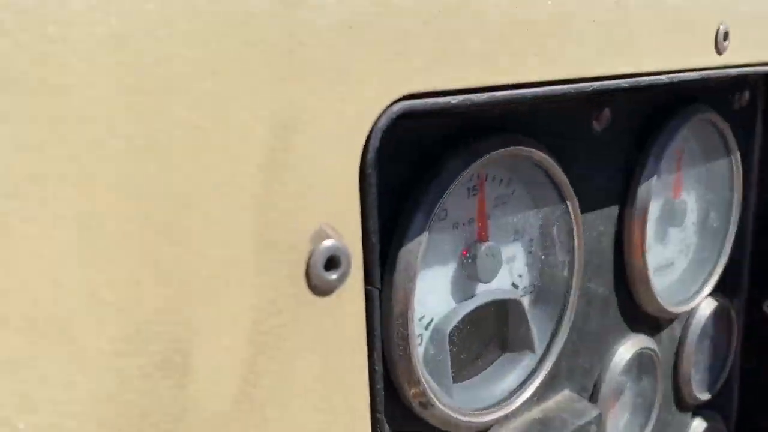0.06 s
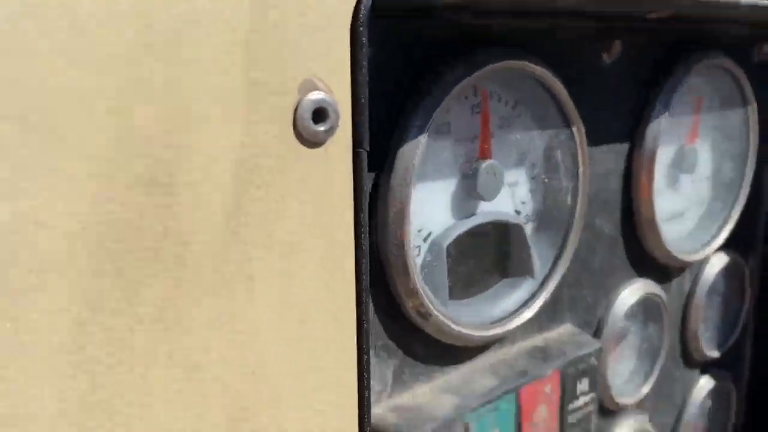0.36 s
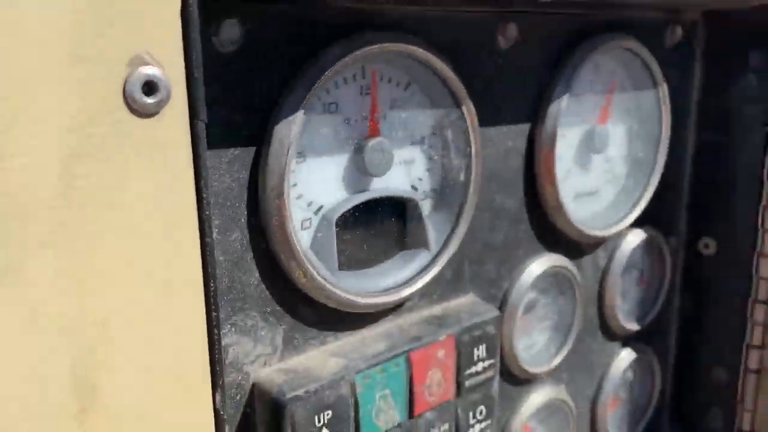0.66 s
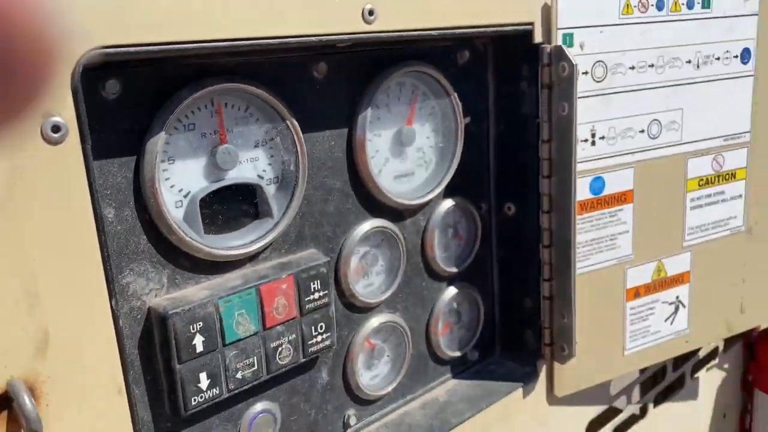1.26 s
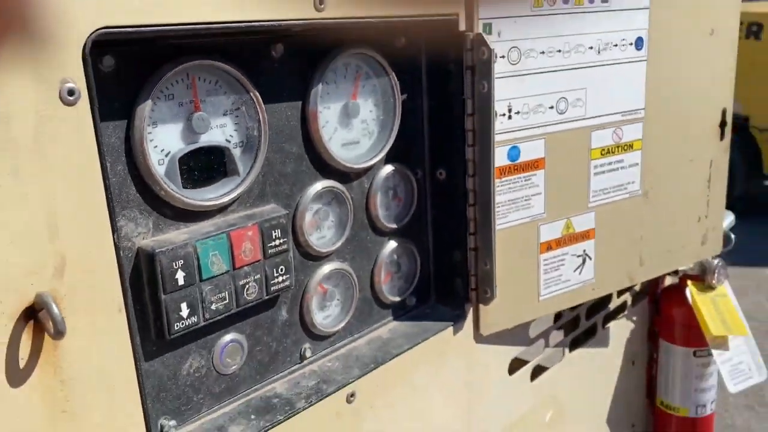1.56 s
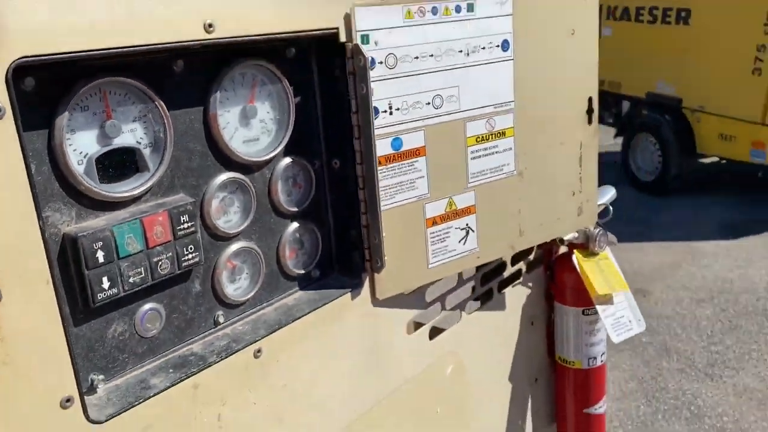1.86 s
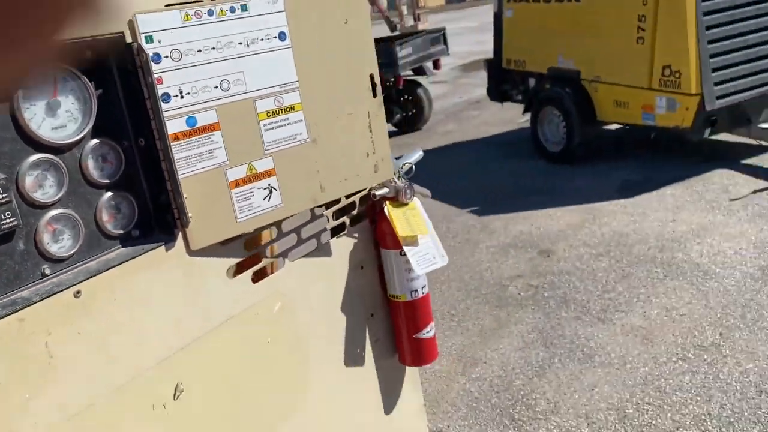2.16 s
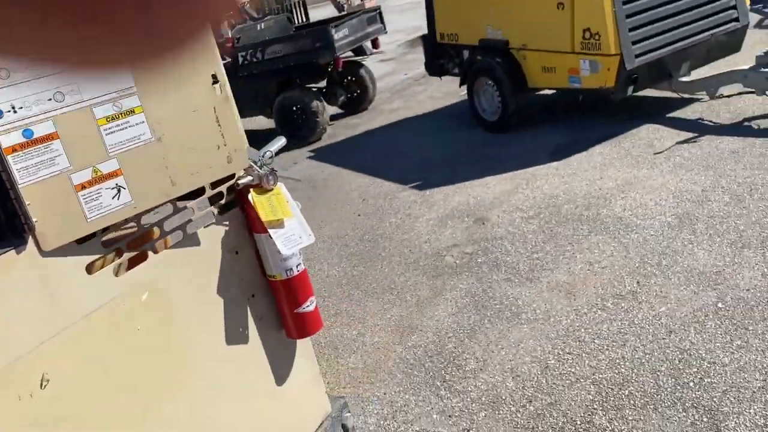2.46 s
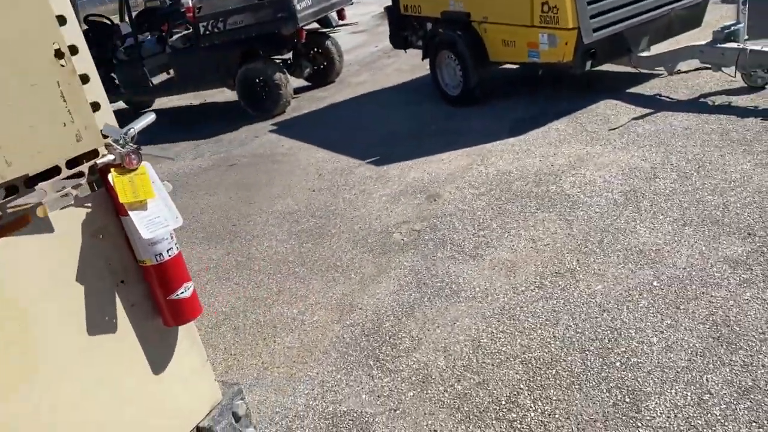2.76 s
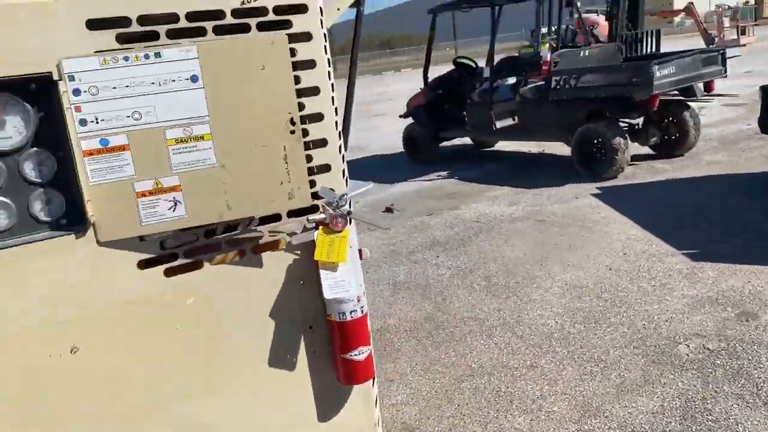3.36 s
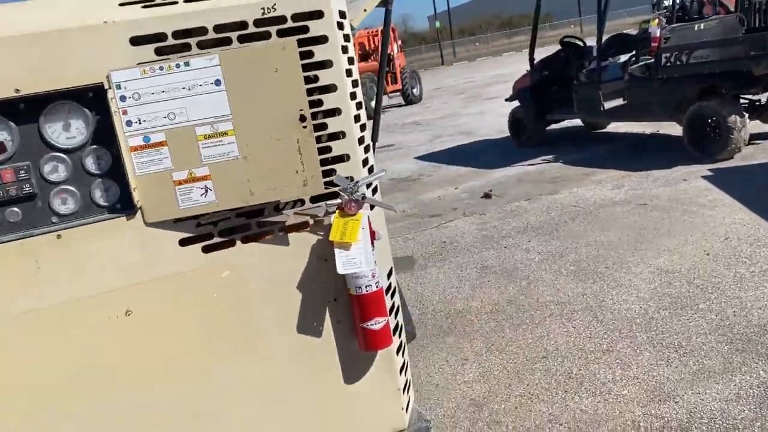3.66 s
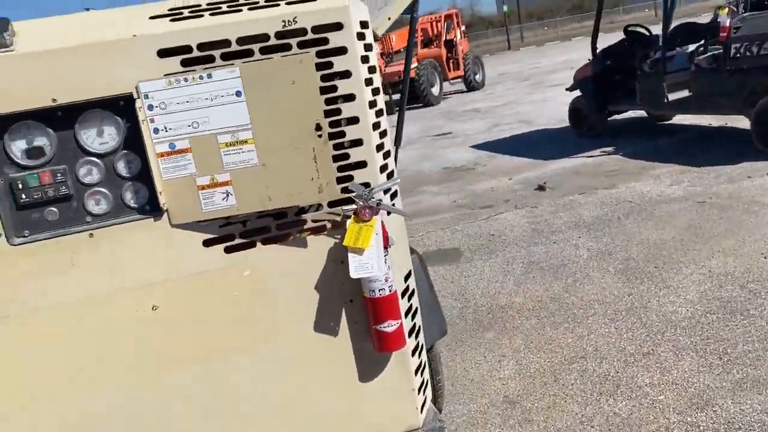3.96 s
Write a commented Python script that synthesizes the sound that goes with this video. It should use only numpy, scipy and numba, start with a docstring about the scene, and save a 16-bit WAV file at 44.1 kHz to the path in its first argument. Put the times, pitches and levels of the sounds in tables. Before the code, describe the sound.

Close by in an open yard, an air compressor dumps air in one loud, brief blast. Its diesel engine and fan then keep humming and clattering under a shifting hiss, which brightens midway as a finger softly bumps the microphone.

```python
"""A towable diesel air compressor in an open yard, heard from beside its control panel.
First a valve dumps air with a loud hiss that rings the steel housing, surges once and shuts.
From half a second on, the four-cylinder engine is left knocking and humming with its cooling fan,
under a hiss of air whose colour shifts as the microphone moves past the housing. Just after
two seconds a bright jet peaks and a finger softly bumps the microphone; the machine runs on."""
import sys
import numpy as np
from scipy import signal
from scipy.fft import rfft, irfft
from scipy.io import wavfile
from scipy.ndimage import uniform_filter1d, map_coordinates
from numba import njit

SR = 44100
rng = np.random.default_rng(int(sys.argv[2]) if len(sys.argv) > 2 else 0)


def waveform_to_disk(signal):
    """Save audio, clipped to [-1, 1], as 16-bit WAV at the path in sys.argv[1]."""
    frames = np.transpose(np.atleast_2d(signal))
    scaled = np.clip(frames, -1, 1) * 32767
    samples = np.round(scaled).astype(np.int16)
    wavfile.write(sys.argv[1], SR, samples)


N = 176400

# Colours of the blow-off's hiss and low roar. Each row: frequency in Hz, relative level in dB.
BLAST_SPECTRUM = [(100, -40), (500, -16), (800, -1), (1100, -4), (1700, 0), (2200, -2), (3200, 0.5),
                  (4100, -0.5), (5200, 0.5), (6200, -2), (7200, -3), (8550, -3.5), (9700, -2.5),
                  (11400, -5), (12600, -10), (15700, -9.5)]
ROAR_SPECTRUM = [(30, -24), (80, -11.5), (160, -8.5), (240, -3.5), (340, -8), (400, -2.5), (510, 1.5),
                 (600, -4), (750, -4), (1000, -6.5), (1800, -11.5), (4000, -21), (10000, -22)]
# Resonances of the steel housing. Each row: centre in Hz, width in Hz, relative level in dB.
HOUSING_MODES = [(1040, 170, -1.5), (2430, 120, 0), (2880, 140, -1.5), (3050, 78, 3), (3380, 100, -1),
                 (3770, 70, -0.5), (4400, 220, -3), (4670, 280, -2.5), (5940, 280, -4.5)]

# Colours of the broad air, bright jet and top sizzle. Each row: frequency in Hz, relative level in dB.
AIR_SPECTRUM = [(800, -25), (2400, -1.5), (3300, -2), (4500, -1.5), (6500, -0.5), (8500, 1), (10000, 3),
                (12000, -0.5), (15700, -11)]
JET_SPECTRUM = [(3000, -37), (6900, -12), (7450, 0), (8900, 2.5), (10500, -1), (11700, 2.5), (12700, -6.5),
                (14500, -5), (16000, -11.5)]
SIZZLE_SPECTRUM = [(4000, -19.5), (8000, -29), (11500, -10), (12600, -3), (13500, 4), (14400, -5),
                   (15800, 0)]
# Their faders; the jet peaks as the microphone passes it. Each row: time in seconds, level in dB.
AIR_FADER = [(.38, -53), (.55, -47.5), (.825, -42.5), (.865, -40), (1.4, -40), (2.2, -41), (2.7, -41.5),
             (3.04, -45), (3.5, -43), (3.7, -47.5), (4, -45)]
JET_FADER = [(.4, -52), (1.05, -47.5), (1.5, -38), (1.9, -36), (2.12, -33.5), (2.35, -36), (2.65, -42.5),
             (3, -58), (4, -54)]
SIZZLE_FADER = [(.4, -51), (.9, -43), (1.5, -39.5), (2.4, -42.5), (2.8, -37.5), (3.1, -41.5), (3.6, -41),
                (4, -39.5)]
# A sweeping band of hiss. Each row: time in seconds, centre in Hz, level in dB.
HISS_SWEEP = [(.4, 5350, -51), (.7, 5540, -73), (1.1, 4850, -53.5), (1.85, 4800, -52), (2.25, 5100, -44),
              (2.5, 5930, -46.5), (2.85, 7030, -45), (3.1, 6640, -55.5), (3.55, 6130, -53), (4, 5300, -62)]
# Brief swells of narrow hiss.
# Each row: peak time in seconds, half length in seconds, centre in Hz, width in Hz, level in dB.
HISS_SWELLS = [(2.87, .07, 3080, 240, -53.5), (3.02, .07, 4150, 160, -54.5), (2.08, 0.12, 4150, 350, -51),
               (2.2, .14, 8900, 450, -46)]
# The notch that reflections cut. Each row: time in seconds, centre in Hz, depth from 0 to 1.
NOTCH_PATH = [(.4, 2880, 0.16), (1.1, 2330, 0.52), (1.6, 3000, 0.15), (2.15, 2980, 0.18), (2.55, 3470, 0),
              (2.75, 4370, .45), (3, 5300, 0.36), (3.15, 4500, 0.1), (3.3, 3250, 0.35), (4, 3350, 0.6)]

# Accents of one engine cycle. Each entry: strength of one cylinder's knock in relative dB.
CYLINDER_ACCENTS = [-0.5, -7, -1, -11.5]
# Exhaust hum. Each row: multiple of the firing rate, level in dB relative to HUM_FADER.
HUM_HARMONICS = [(1, -18.5), (2, -16.5), (3, -17), (4, -15)]
# Colours of the engine's rumble and clatter. Each row: frequency in Hz, relative level in dB.
RUMBLE_SPECTRUM = [(30, -45), (48, -30), (65, -15.5), (125, -10), (155, 2), (215, -1.5), (300, -3.5),
                   (400, -10.5), (550, -10.5), (900, -36.5), (2000, -57)]
CLATTER_SPECTRUM = [(200, -29), (450, 0), (800, 1), (1400, 2), (2200, -3.5), (3200, -5.5), (4500, -10),
                    (8000, -51), (16000, -39)]
# Resonances of the engine block. Each row: centre in Hz, width in Hz, relative level in dB.
BLOCK_MODES = [(534, 42, 0.5), (780, 110, -3.5), (902, 40, -1), (1507, 154, 1), (1900, 150, -3),
               (2256, 73, -6)]
# Faders of the hum and the ringing block, which is clearer near the grille.
# Each row: time in seconds, level in dB.
HUM_FADER = [(.38, -60), (.6, -44), (.9, -45), (2, -46.5), (3.3, -47), (3.7, -45.5), (4, -45)]
BLOCK_FADER = [(.38, -60), (.9, -58.5), (1.5, -54.5), (2.2, -54), (2.7, -54.5), (3.5, -53), (4, -56.5)]
# Machine faders. Each row: time in seconds, rumble and fan level in dB, clatter level in dB before trim.
MACHINE_FADERS = [(.38, -56.5, -50.5), (.5, -50.5, -54), (.81, -50, -53.5), (.87, -45.5, -48.5),
                  (1.2, -46.5, -48.5), (1.5, -47, -47), (2.1, -48, -48), (2.65, -48.5, -50),
                  (3.4, -48.5, -50.5), (4, -51, -48.5)]
# Fan tones. Each row: multiple of the blade rate, level in dB relative to the fan's fader.
FAN_HARMONICS = [(1, -7), (2, -11), (3, -17), (5, -19)]

TIME = np.arange(N) / SR


def blow_off():
    """The open valve roars, surges once and shuts: the low roar stops first, the ringing housing last."""
    hiss_db, housing_db, roar_db = -22.5, -29, -26.5
    housing_lag_s, roar_end_s, roar_fade_s = .012, 0.231, 0.038
    hiss = colour(noise(), BLAST_SPECTRUM) * undb(hiss_db) * valve(TIME)
    housing = ring(noise(), HOUSING_MODES) * undb(housing_db) * valve(TIME - housing_lag_s)
    flow = np.clip(1 - (TIME - roar_end_s) / roar_fade_s, 0, 1)
    surge_db = 5 * bell(at_s=0.197, half_s=0.0087)
    roar = colour(noise(), ROAR_SPECTRUM) * flow
    roar *= undb(roar_db + surge_db + 2.5 * wander(66))  # a fast flutter rides on the roar
    return panel_echoes(hiss + housing, gain=0.053, drift_s=.00004, longest_s=.016) + roar


def valve(t, close_s=0.24, fall_db_s=36, fall_db_s2=1400):
    """Gain of the escaping air: steady, then falling ever faster as the valve shuts."""
    closing = np.maximum(t - close_s, 0)
    return undb(-fall_db_s * closing - fall_db_s2 * closing ** 2)


def air_hiss(sweep_width_hz=2100., flicker_db=.5):
    """Steadily escaping air, its bands swelling and fading as the microphone moves round the housing."""
    layers = [(AIR_SPECTRUM, AIR_FADER), (JET_SPECTRUM, JET_FADER), (SIZZLE_SPECTRUM, SIZZLE_FADER)]
    hiss = sum(colour(noise(), spectrum) * undb(curve(fader)) for spectrum, fader in layers)
    centre_hz = curve(HISS_SWEEP)
    band = bandpass(bandpass(noise(), centre_hz, sweep_width_hz), centre_hz, sweep_width_hz)
    hiss += unit(band) * undb(curve(HISS_SWEEP, column=2))
    reflected = panel_echoes(hiss, gain=0.15, drift_s=.00011, longest_s=0.0059)
    return reflected * undb(flicker_db * wander(25.2))


def hiss_swells():
    """Narrow resonances of the hiss come and go with the listening position."""
    out = np.zeros(N)
    for at_s, half_s, hz, width, db in HISS_SWELLS:
        mode = [(hz, width, 0)]
        out += undb(db) * bell(at_s, half_s) * ring(ring(noise(), mode), mode)
    return out


def engine(firing_hz=50.3, knock_decay_s=0.0097, scatter_db=1.6, throb_db=0.86, clatter_trim_db=-0.5):
    """Each firing pumps the exhaust hum and rumble and knocks the block; the cylinders differ."""
    firings = np.cumsum(firing_hz * (1 + .001 * wander(4))) / SR
    index = firings.astype(int)
    accent_db = np.array(CYLINDER_ACCENTS)[index % len(CYLINDER_ACCENTS)]
    strength = undb(accent_db + scatter_db * noise()[index])
    knock = strength * np.exp(-(firings % 1) / firing_hz / knock_decay_s)
    hum = sum(undb(db) * harmonic(firings, multiple) for multiple, db in HUM_HARMONICS)
    # The knocks ride on a steady bed of noise: the lower the bed, the harder the pulse.
    rumble = undb(throb_db * wander(26.31)) * colour(noise() * (1.8 + knock), RUMBLE_SPECTRUM)
    clatter = undb(clatter_trim_db) * colour(noise() * (1.36 + knock), CLATTER_SPECTRUM)
    block = ring(noise() * (0.3 + knock), BLOCK_MODES)
    return (hum * undb(curve(HUM_FADER))
            + rumble * undb(curve(MACHINE_FADERS))
            + clatter * undb(curve(MACHINE_FADERS, column=2))
            + block * undb(curve(BLOCK_FADER)))


def cooling_fan(blade_hz=148.3, wobble=0.0049, flutter_db=2.4):
    """Blade tones that waver in the turbulent cooling air."""
    blades = np.cumsum(blade_hz * (1 + wobble * wander(14))) / SR
    tones = sum(undb(db + flutter_db * wander(11)) * harmonic(blades, multiple)
                for multiple, db in FAN_HARMONICS)
    return tones * undb(curve(MACHINE_FADERS))


def finger_bump(at_s=2.19, hz=70, level_db=-49):
    """A finger brushes the microphone: one soft low thud."""
    return undb(level_db) * bell(at_s, half_s=0.02) * np.sin(2 * np.pi * hz * (TIME - at_s))


def panel_echoes(x, gain, drift_s, longest_s, count=18):
    """Short echoes from steel panels and ground; their paths drift as the microphone moves."""
    out = x
    for lag_s in rng.uniform(longest_s / 10, longest_s, count):
        delay = (lag_s + drift_s * wander(2)) * SR
        out = out + gain * map_coordinates(x, [np.arange(N) - delay], order=2, mode="wrap")
    return out / np.sqrt(1 + count * gain ** 2)


def reflection_notch(x, width_hz=1120.):
    """A moving hollow, where direct and reflected sound cancel."""
    depth = np.clip(curve(NOTCH_PATH, column=2), 0, 1)
    return x - depth * bandpass(x, curve(NOTCH_PATH), width_hz)


def ring(x, modes):
    """Pass a sound through a body's resonances, at rms 1."""
    return unit(sum(undb(db) * bandpass(x, np.full(N, float(hz)), float(width))
                    for hz, width, db in modes))


@njit
def bandpass(x, hz, width):
    """State-variable band-pass with a moving centre."""
    out, band_state, low_state = np.empty(len(x)), 0., 0.
    for i in range(len(x)):
        tuning, damping = np.tan(np.pi * hz[i] / SR), width / hz[i]
        band = (band_state + tuning * (x[i] - low_state)) / (1 + tuning * (tuning + damping))
        band_state = 2 * band - band_state
        low_state += 2 * tuning * band
        out[i] = damping * band
    return out


def colour(x, points):
    """EQ a sound through (Hz, dB) points, at rms 1."""
    hz, db = np.array(points, float).T
    bins = np.maximum(np.fft.rfftfreq(N, 1 / SR), 1)
    gain = undb(np.interp(np.log(bins), np.log(hz), db))
    return unit(irfft(rfft(x) * gain, N))


def harmonic(cycles, multiple):
    """A sine locked to a running cycle count, at random phase and rms 1."""
    return np.sqrt(2) * np.sin(2 * np.pi * (multiple * cycles + rng.random()))


def wander(rate_hz):
    """Smooth random modulation at rms 1: held steps, slewed twice."""
    hold = int(SR / rate_hz)
    steps = np.repeat(noise()[:N // hold + 1], hold)
    return unit(uniform_filter1d(uniform_filter1d(steps, hold), hold)[:N])


def curve(table, column=1):
    """Automation from one column of a table: straight lines in time, ends held."""
    rows = np.array(table, float)
    return np.interp(TIME, rows[:, 0], rows[:, column])


def bell(at_s, half_s):
    """A bell-shaped envelope peaking at 1."""
    return np.exp(-((TIME - at_s) / half_s) ** 2)


def noise():
    """White noise."""
    return rng.standard_normal(N)


def undb(db):
    """Decibels to gain."""
    return 10 ** (np.asarray(db) / 20)


def unit(x):
    """Scale to rms 1."""
    return x / np.sqrt(np.mean(x ** 2))


def scene():
    """Blast, machine and hiss reach one microphone; both channels carry the same sound."""
    mono = blow_off() + reflection_notch(engine() + air_hiss())
    mono += hiss_swells() + cooling_fan() + finger_bump()
    return np.array([mono, mono])


def record(dry):
    """A low cut takes off the deepest bass, a steep high cut the very top."""
    low_cut = signal.butter(4, 40, "high", fs=SR, output="sos")
    high_cut = signal.ellip(12, .2, 80, 15750, fs=SR, output="sos")
    return signal.sosfilt(high_cut, signal.sosfilt(low_cut, dry))


dry = scene()
out = record(dry)
waveform_to_disk(out)
```